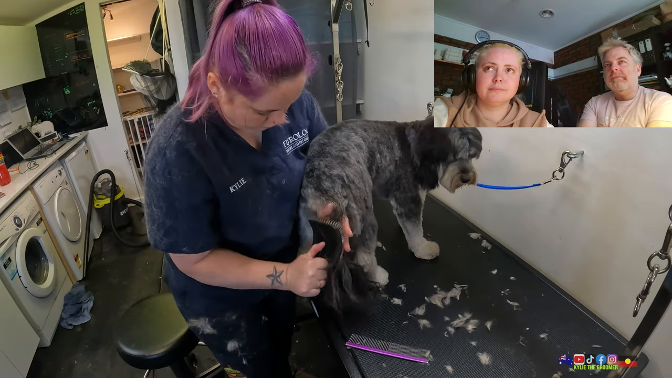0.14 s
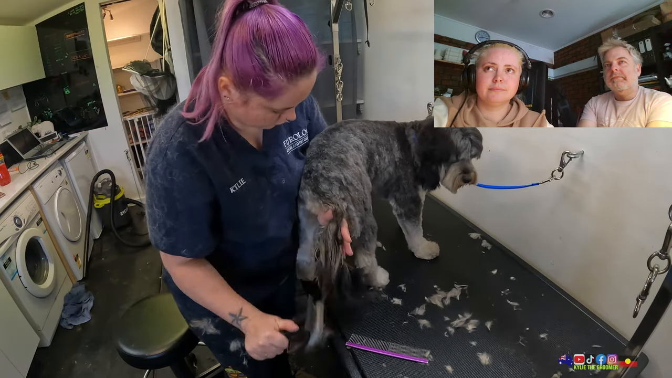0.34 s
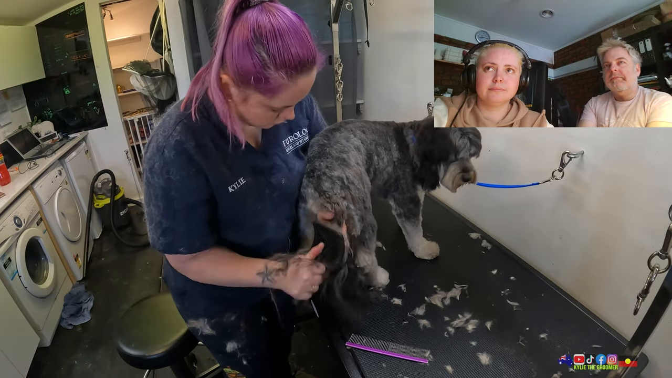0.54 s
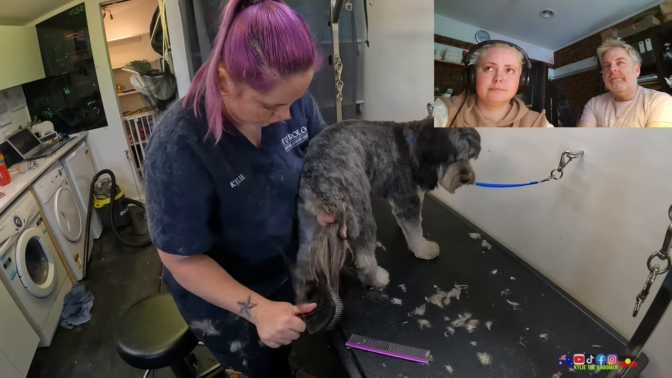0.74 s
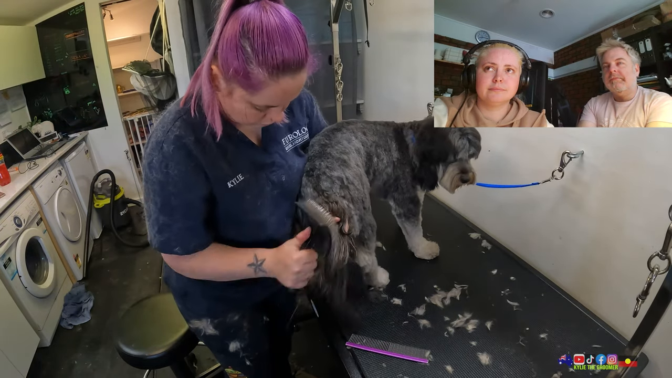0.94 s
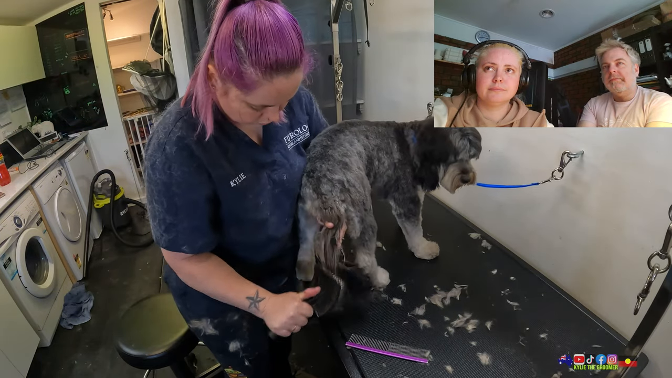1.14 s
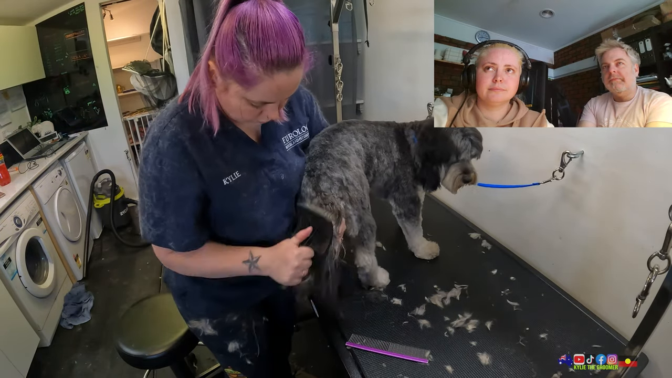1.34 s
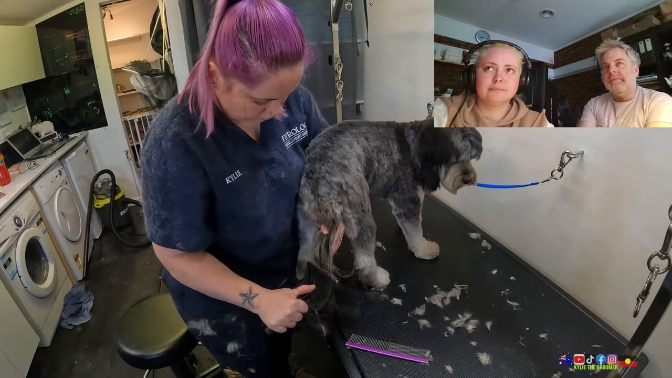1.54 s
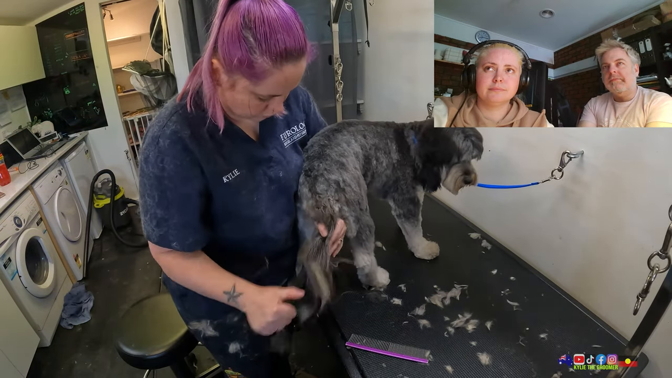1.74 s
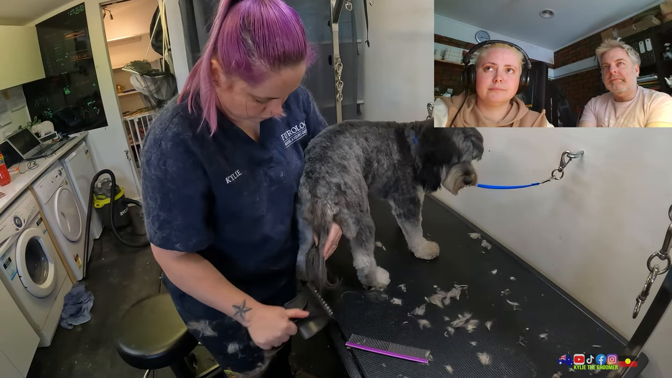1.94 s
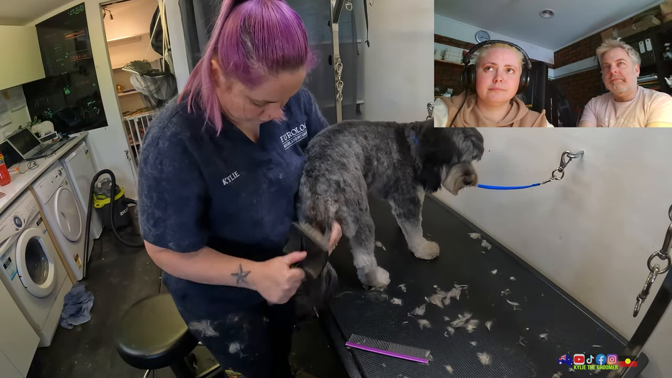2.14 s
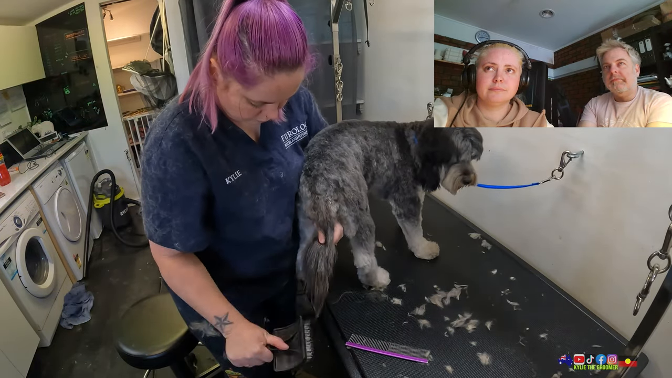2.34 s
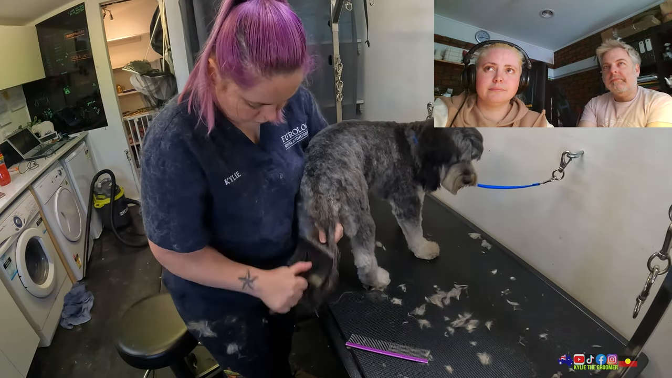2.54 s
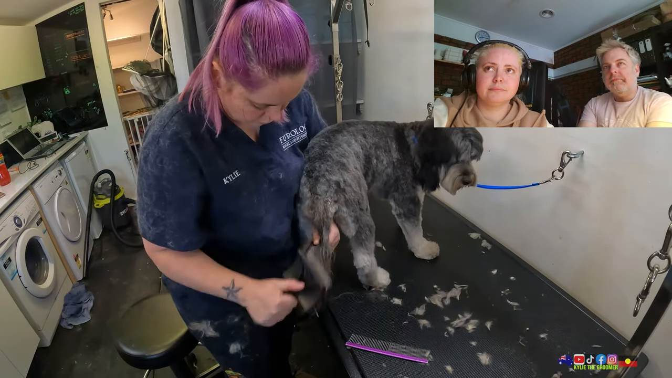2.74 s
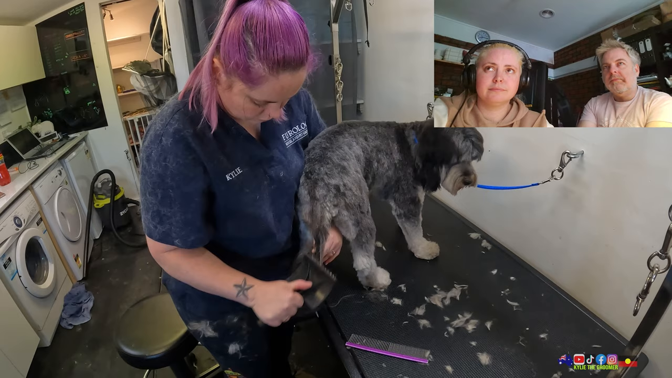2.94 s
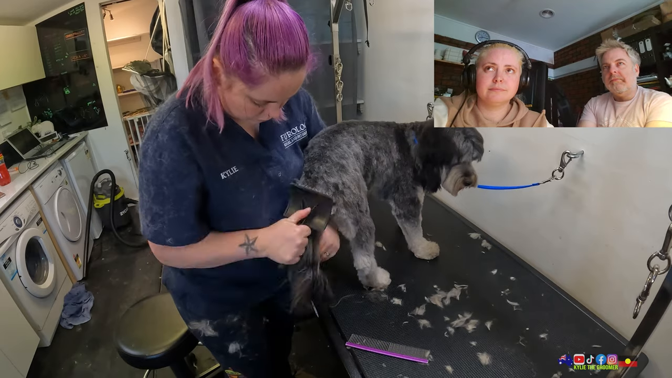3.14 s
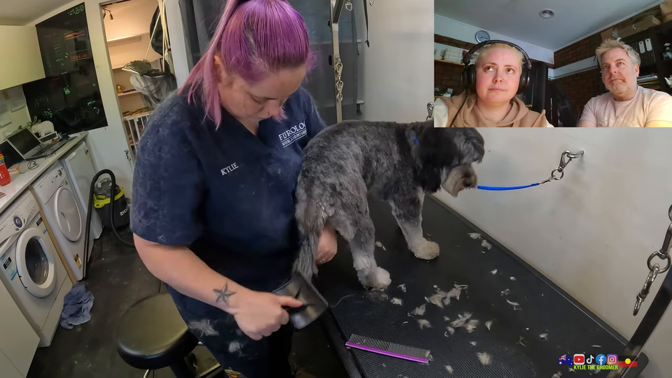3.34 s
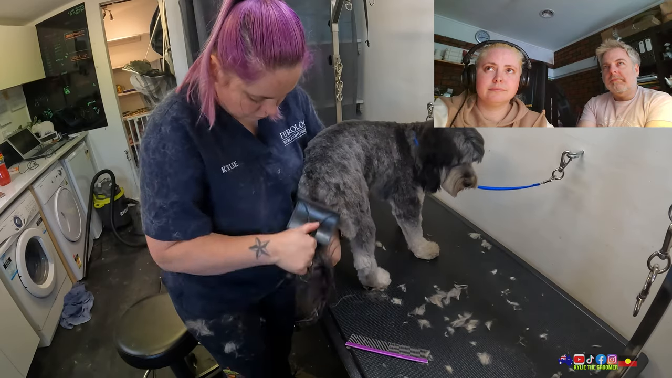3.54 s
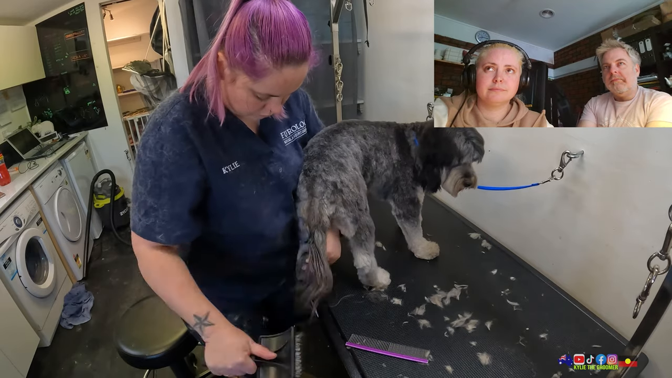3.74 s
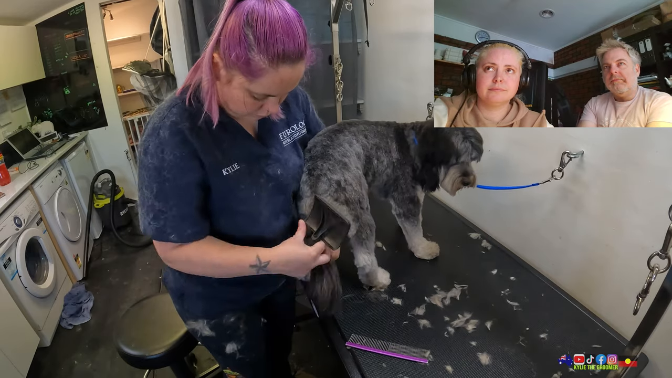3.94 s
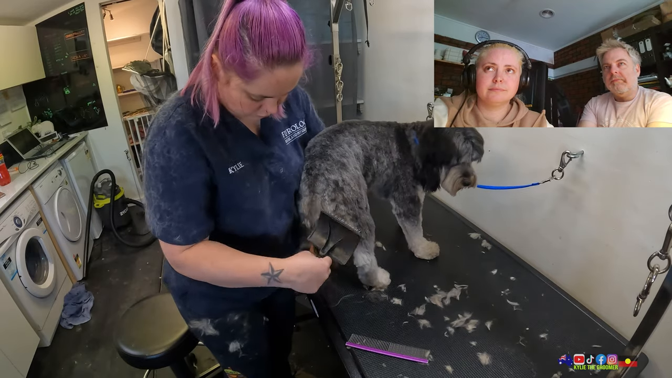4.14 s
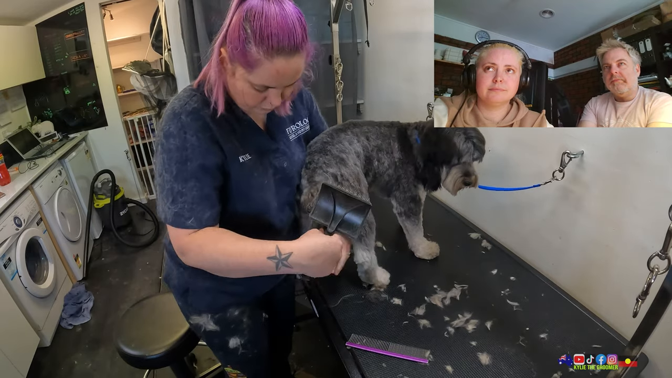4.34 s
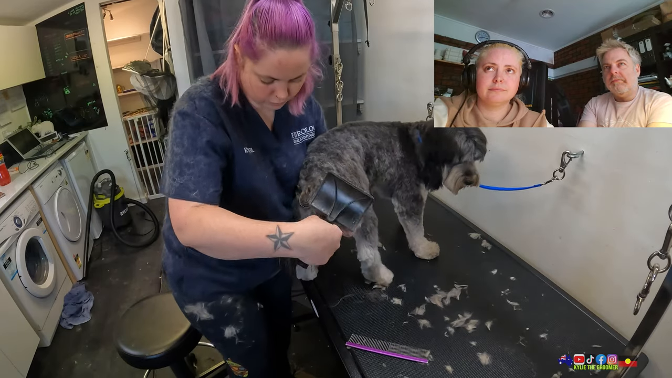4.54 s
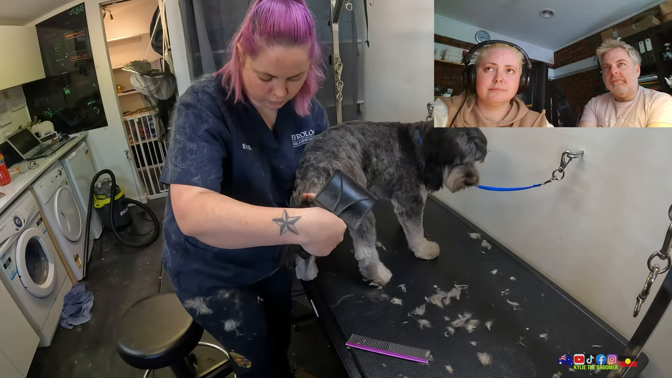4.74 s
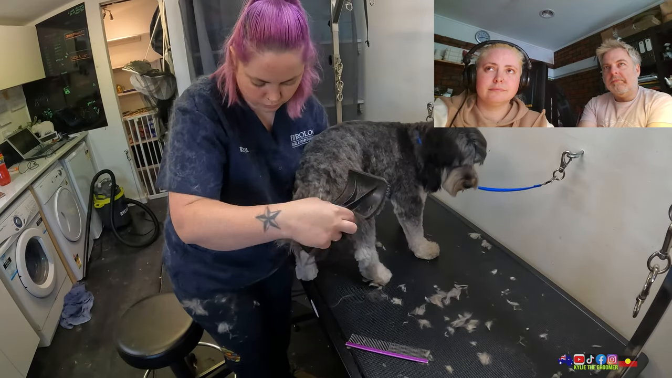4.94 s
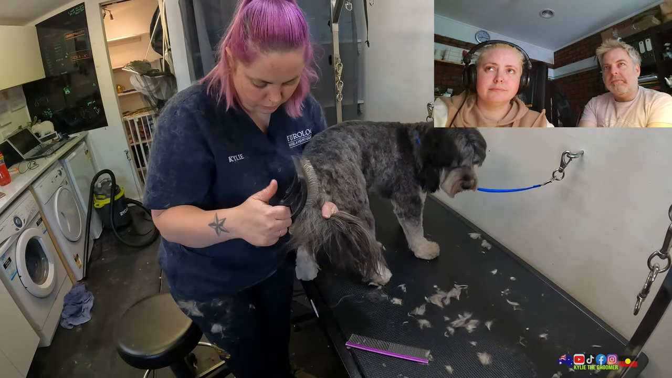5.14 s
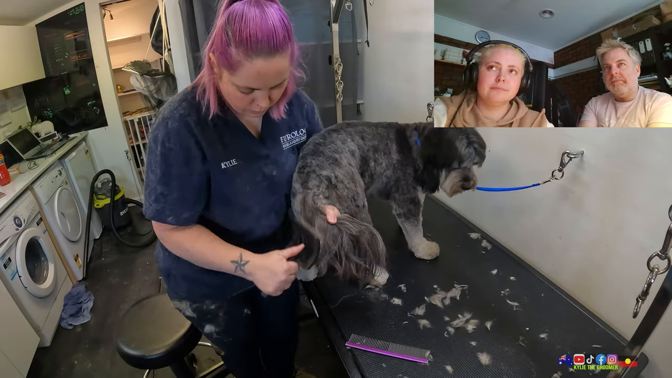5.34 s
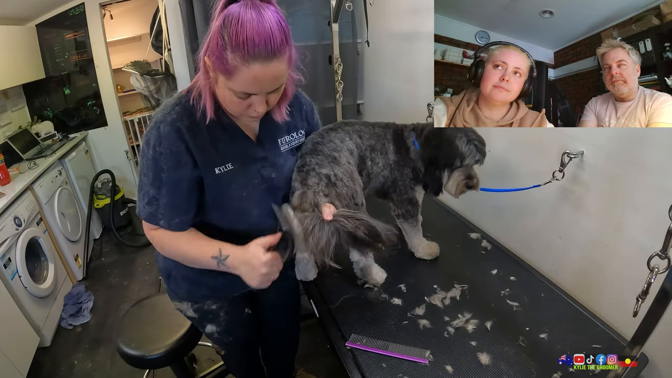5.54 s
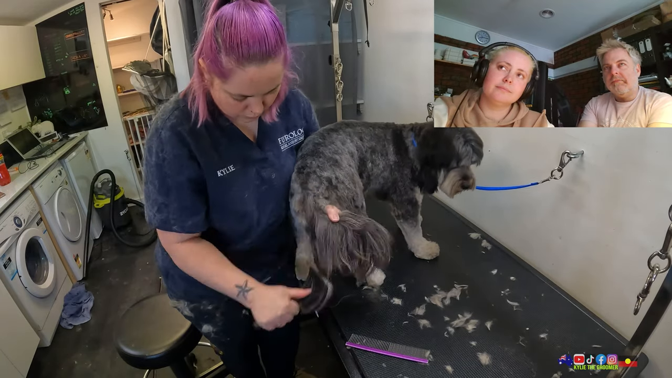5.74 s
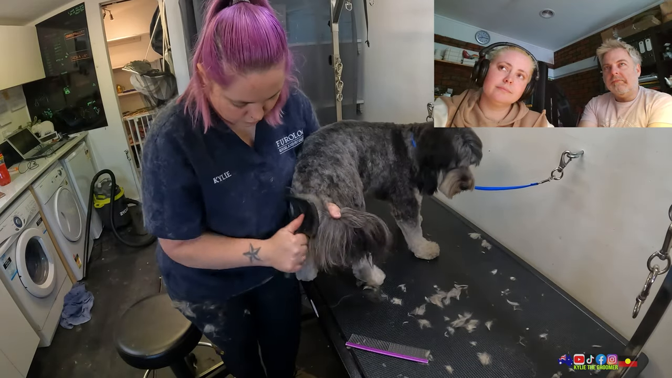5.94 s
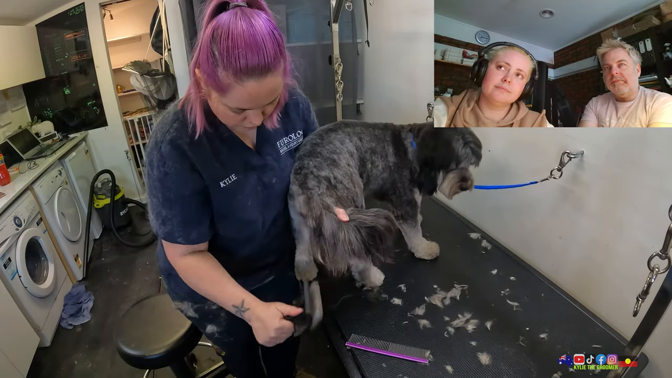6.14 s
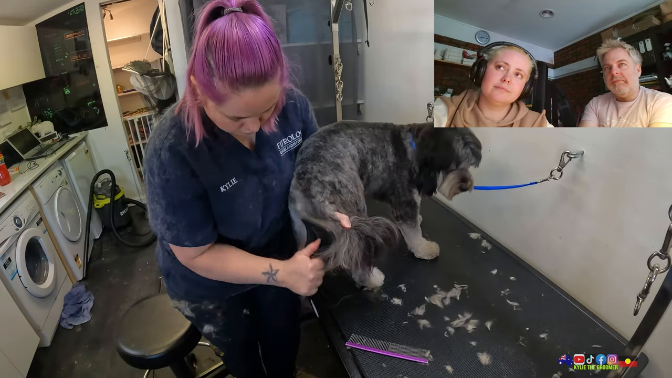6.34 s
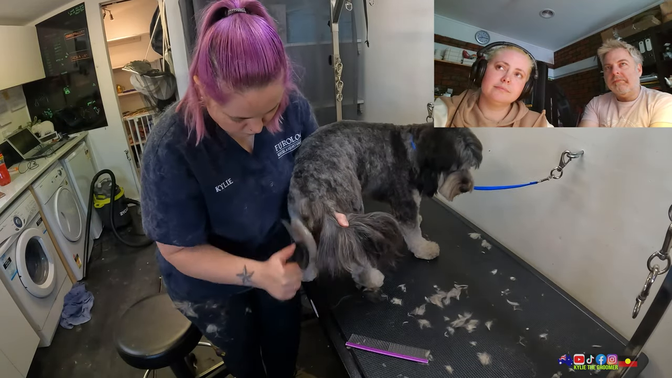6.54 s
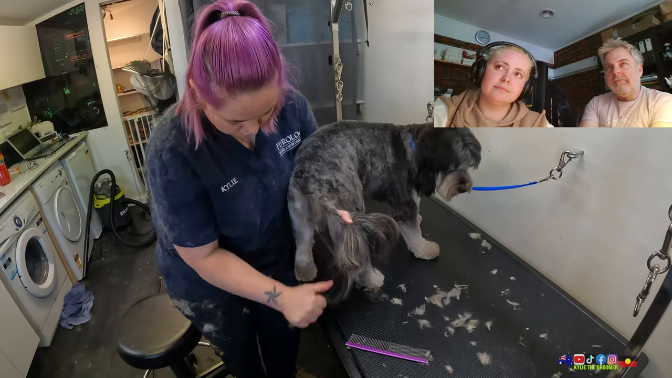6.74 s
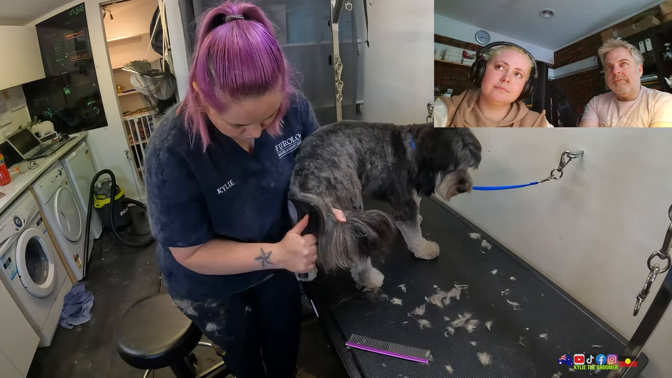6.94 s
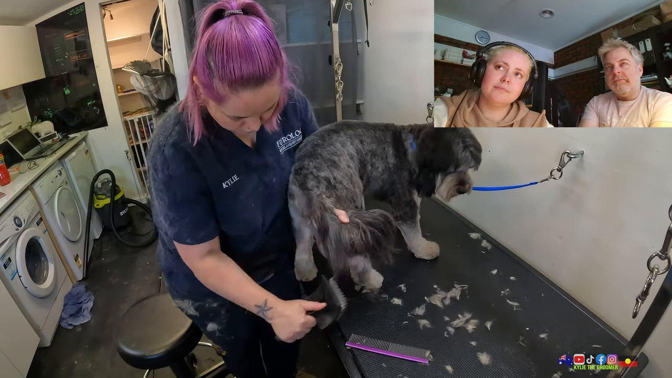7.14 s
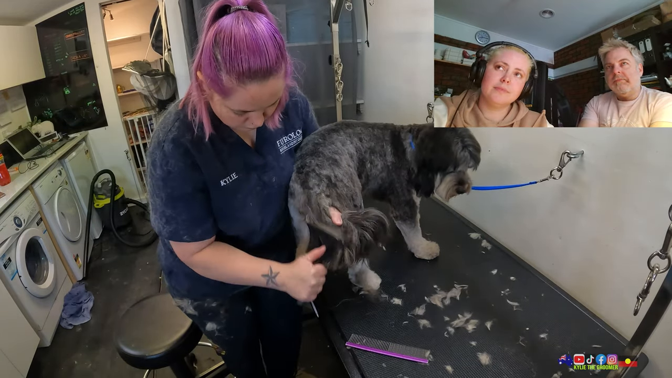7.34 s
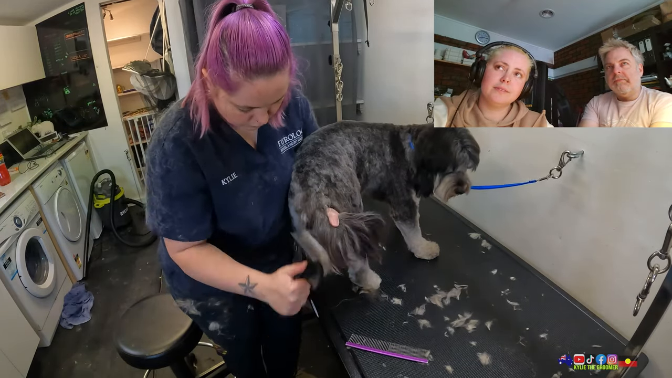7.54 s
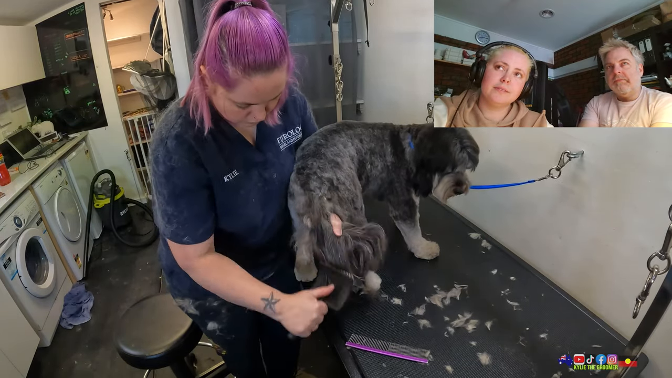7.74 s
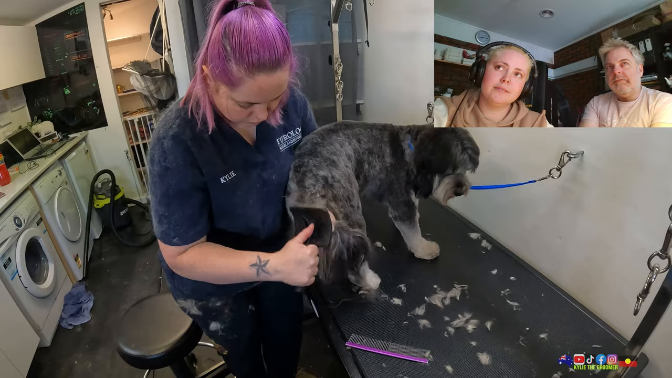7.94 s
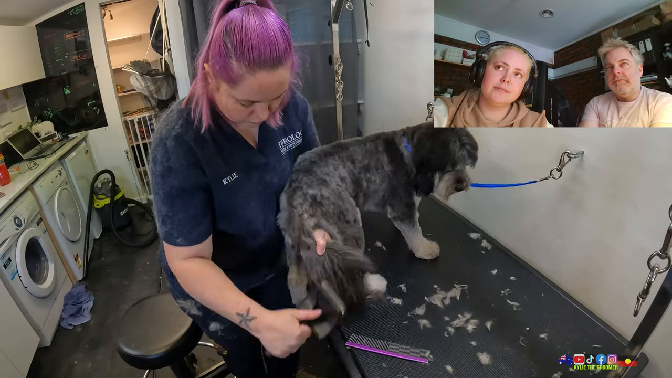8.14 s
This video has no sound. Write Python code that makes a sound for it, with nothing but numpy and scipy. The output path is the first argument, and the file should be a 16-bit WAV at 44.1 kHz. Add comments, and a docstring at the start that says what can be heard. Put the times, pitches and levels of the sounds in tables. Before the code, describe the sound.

A wire slicker brush rakes a dog's matted tail in quick, scratchy strokes, pausing midway for soft handling, over a faint machine drone indoors.

```python
"""A slicker brush is raked through a dog's matted tail in a small, hard-walled grooming room.
Each stroke lands with a tick, bites and drags its wire pins: random plucks excite the modes of the
brush's back, its hollow, pad and pins. Tearing tufts and rubbing hair are short bands of plucks.
Midway the groomer pauses to turn the tail over, with clinks, knocks (filtered noise) and rustles.
A machine drones throughout as narrow-band noise, and two damped low sines bump at the end."""
import sys
import numpy as np
from scipy import signal
from scipy.fft import rfft, irfft, next_fast_len
from scipy.io import wavfile

SR = 44100
rng = np.random.default_rng(int(sys.argv[2]) if len(sys.argv) > 2 else 0)


def put_to_file(sound):
    """Save the sound as 16-bit audio at rate SR, in the file named by the first command-line argument."""
    columns = np.atleast_2d(sound).T  # one column per channel
    safe = np.clip(columns, -1, 1)
    whole_steps = np.round(safe * 32767)
    wavfile.write(sys.argv[1], SR, whole_steps.astype(np.int16))


N = 361619  # length in samples

# Strokes of the brush: landing [t/s], tick [relative level/dB], bite after landing [t/s],
# end of pull after landing [t/s], pull [relative level/dB], tightening from bite to end [level/dB],
# hollow ring [relative level/dB], hollow pitch [f/Hz], scratchiness [relative level/dB]
STROKES = [ (0.158, -23, 0.036, 0.24, -37.5, -5, 2.5, 2015, 2),
           (0.5776, -18.5, 0.045, 0.24, -36, -7.5, 3, 2020, 0.5),
           (1.091, -19, 0.027, 0.15, -35.5, 6, -2, 1970, 2),
           (1.482, -24.5, 0.034, 0.2, -35, -9, -7, 1900, 1),
           (1.919, -36, 0.037, 0.13, -33, -6.5, 0.5, 1930, 3),
           (2.272, -33, 0.031, 0.12, -33.5, -0.5, 2, 1900, 3),
           (2.597, -31, 0.032, 0.074, -32, 11, 1, 1940, 3),
           (2.9432, -26.5, 0.021, 0.11, -35.5, 3, 1, 1820, 2),
           (3.249, -30, 0.031, 0.16, -39.5, 1.5, 7, 1910, 4),
           (3.622, -27.5, 0.015, 0.13, -35.5, 8.5, -3, 1770, 2.5),
           (5.333, -26.5, 0.012, 0.11, -39, 8.5, -4, 2220, -3.5),
           (5.715, -26.5, 0.024, 0.072, -33, -0.5, 2.5, 2120, -1.5),
           (6.040, -25, 0.028, 0.08, -32, 0.5, -0.5, 1980, -2),
           (6.369, -28, 0.029, 0.11, -34.5, 8.5, 1.5, 2000, -2.5),
           (6.713, -31, 0.034, 0.075, -32.5, 9, 6, 1936, 1),
           (7.0354, -26, 0.036, 0.13, -34, 2.5, 1.5, 1990, -2),
           (7.396, -24.5, 0.027, 0.089, -33.5, -0.5, -3, 1960, -1),
           (7.719, -23, 0.03, 0.092, -33, 2.5, -0.5, 1930, -2),
           (8.032, -20, 0.025, 0.11, -32, -1, -2.5, 2030, 1)]
SKIM_DB, BITE_S = -17, 0.019  # level of the skimming pins below their bite; time to dig in
ARCH_DB, RELEASE_DB_PER_S = 2.5, 375  # middle of the pull above its ends; decay as the pins come free


def pull():
    """Friction envelope: the pins skim the coat, bite, pull through in an arch and come free."""
    t, drag = np.arange(SR // 2) / SR, np.zeros(N)
    for landing, _, bite, length, pull_db, tightening_db, *_ in STROKES:
        way = np.interp(t, [bite, length], [-1, 1])  # -1 at the bite, 1 at the end
        level = pull_db + tightening_db * way / 2 - ARCH_DB * way ** 2
        skim = SKIM_DB * np.clip((bite - t) / BITE_S, 0, 1)
        release = RELEASE_DB_PER_S * np.maximum(t - length, 0)
        add(drag, landing, from_db(level + skim - release))
    return drag


# Resonances of the brush's back: [f/Hz], width [f/Hz], [relative level/dB]
BACK = [(722, 33, -0.5), (1046, 40, -3), (1204, 33, 2), (1293, 34, -9.5), (1565, 42, -1.5),
        (1760, 73, -2.5), (2080, 66, -19.5), (2320, 150, 3), (2880, 500, -2.5)]
# Spectrum of the rubber pad: [f/Hz], [relative density level/dB]
PAD = [(150, -24.5), (300, -3.5), (500, -8), (880, -6.5), (1200, 1), (2200, 2.5), (3200, -18.5),
       (6000, -40.5)]
# Spectrum of the wire pins: [f/Hz], [relative density level/dB]
PINS = [(1000, -13.5), (2300, -2), (4200, -2), (5200, 1), (6500, -6), (8200, -9), (9800, -23), (12500, -11),
        (14500, -47), (16000, -66)]
# Spectrum of the pin tips: [f/Hz], [relative density level/dB]
TIPS = [(6000, -26), (10000, -10), (12400, -6), (14000, -8.5), (16000, -64)]
CATCH_HZ = 59  # corner frequency of the catching and slipping
HOLLOW_WIDTH_HZ, HOLLOW_FADE_DB_PER_S = 110, 48


def brushing(back_db, hollow_db, pad_db, pins_db, tips_db, catch_db, flex_db, tangle_db):
    """Stick-slip excitation of coupled parts: plucks ring the back, hollow, pad, pins and tips."""
    t, strokes = np.arange(N) / SR, np.array(STROKES)
    current = np.maximum(np.searchsorted(strokes[:, 0], t) - 1, 0)
    landing, _, bite, *_, ring_db, hollow_hz, scratch_db = strokes[current].T
    drag = pull()
    force = drag * from_db(catch_db * drift(CATCH_HZ))  # the pins catch and slip in the tangles
    slips = plucks(per_s=5000, spread_db=1.5)

    # the load moves across the pad, so the resonances of the back come and go
    back = np.zeros(N)
    for hz, width, db in BACK:
        shifted = np.roll(slips, rng.integers(0, 300))
        back += from_db(db + flex_db * drift(14)) * flexing(shifted, hz, width)
    back = from_db(back_db) * rms_one(back) * force

    # the hollow rings most at the bite, then is damped as hair fills the pins
    hollow_level = hollow_db + ring_db - HOLLOW_FADE_DB_PER_S * np.abs(t - landing - bite)
    hollow = rms_one(flexing(slips, hollow_hz, HOLLOW_WIDTH_HZ)) * from_db(hollow_level) * drag

    pad = colour(plucks(per_s=4000, spread_db=2.0) * force * from_db(pad_db), PAD)
    pins_level = pins_db + scratch_db + tangle_db * drift(20)
    pins = colour(plucks(per_s=5000, spread_db=2.0) * force * from_db(pins_level), PINS)

    # very uneven plucks sound the tips with a very high ping
    tips_level = tips_db + 0.9 * scratch_db + 3 * drift(50)
    tips = colour(plucks(per_s=3500, spread_db=3.6) * drag * from_db(tips_level), TIPS)
    return back + hollow + pad + pins + tips


DETUNE = 0.022  # rms wander of a resonance, as a share of its frequency


def flexing(x, hz, width_hz):
    """Time-varying resonance by heterodyning: its pitch wanders as the pad flexes; gain 1 on top."""
    r = np.exp(-np.pi * width_hz / SR)
    turn = np.exp(2j * np.pi * np.cumsum(hz * (1 + DETUNE * drift(12.0))) / SR)
    baseband = signal.lfilter([1 - r], [1, -r], x / turn + 1e-18)
    return 2 * (turn * baseband).real


# Tufts tearing out of the mats: loudest [t/s], 1/e half length [t/s], [level/dB], pitch [f/Hz]
TEARS = [(.384, 0.0069, -33.5, 1620), (1.593, 0.017, -35.5, 2420), (3.016, 0.019, -33, 3460),
         (3.689, 0.0052, -35, 1990), (3.738, 0.015, -34, 4330), (8.13, 0.026, -31.5, 2340),
         (8.171, 0.013, -35, 2740)]


def tears():
    """Rapid successive release: each tearing tuft is a surge of equal plucks in a broad band."""
    return scrapes(TEARS, width=0.79, per_s=4000, spread_db=0.0)


# Spectrum of ticks and snaps: [f/Hz], [relative density level/dB]
TICK = [(200, -8), (800, 9.5), (1800, 15), (4000, 10), (6000, 13), (9500, 1.5), (13000, 6), (16000, -25)]


def landings(landing_db, patter_db):
    """Impact excitation: the bed of pins lands with a crack and a short, softer patter."""
    track = np.zeros(N)
    for s, db, *_ in STROKES:
        impact = burst(0.0017) + from_db(patter_db) * burst(0.033)
        add(track, s, from_db(db + landing_db) * impact)
    return colour(track, TICK)


# Pins snapping free of the biggest knots: [t/s], [relative level/dB]
SNAGS = [(0.377, -30), (3.071, -31), (3.322, -23), (3.398, -23)]


def snags(snag_db):
    """Sudden release of tension: a very short noise burst for each snapping knot."""
    track = np.zeros(N)
    for s, db in SNAGS:
        add(track, s, from_db(db + snag_db) * burst(0.0075))
    return colour(track, TICK)


# Bent pins springing back: [t/s], [relative level/dB]
PINGS = [(5.344, -45), (5.431, -39.5), (7.468, -35)]


def pings():
    """Elastic recoil: bent pins spring back with a decaying, very high noise band."""
    track = np.zeros(N)
    for s, db in PINGS:
        add(track, s, from_db(db) * burst(0.021))
    return colour(track, TIPS)


SQUEAK_S, SQUEAK_SWELL_S, SQUEAK_FADE_S = 1.342, 0.008, 0.06  # loudest time; time constants
SQUEAK_HZ, SQUEAK_BEND_HZ_PER_S2 = 3230, 22000
SQUEAK_DB, SQUEAK_FLUTTER_DB = -60.5, 4


def squeak():
    """Frequency modulation: a faint, fluttering sine starts level and bends upward as it fades."""
    since = np.clip(np.arange(N) / SR - SQUEAK_S, 0, 0.15)
    pitch = SQUEAK_HZ + SQUEAK_BEND_HZ_PER_S2 * since ** 2
    level = from_db(SQUEAK_DB + SQUEAK_FLUTTER_DB * drift(60))
    tone = np.sin(2 * np.pi * np.cumsum(pitch) / SR)
    return level * swell(SQUEAK_S, SQUEAK_SWELL_S, SQUEAK_FADE_S) * tone


# Light metallic clinks between strokes: [t/s], [relative level/dB]
CLINKS = [(1.394, -46), (1.7716, -39.5), (2.8602, -42), (5.636, -37), (5.8797, -39.5), (6.004, -49)]
# Resonances of the clinking metal: [f/Hz], width [f/Hz], [relative level/dB]
METAL = [(1630, 440, -4.5), (2140, 61, -4), (2680, 220, -9.5), (3970, 520, -15.5), (5620, 290, -11),
         (11330, 47, -17)]


def clinks(clink_db):
    """Modal excitation: decaying noise jingles a parallel bank of metal resonances."""
    jingle = np.zeros(N)
    for s, db in CLINKS:
        add(jingle, s, from_db(db + clink_db) * burst(0.12))
    return sum(from_db(db) * resonate(jingle, hz, width) for hz, width, db in METAL)


# The brush shifting in the hand: [t/s], [relative level/dB], pitch [f/Hz]
KNOCKS = [(3.8684, -45.5, 4670), (4.153, -47, 1820), (4.192, -49, 1790), (4.536, -39, 2520),
          (4.8175, -44, 1440), (4.925, -46.5, 2630), (5.03, -48.5, 3360), (5.551, -50, 3480)]


def knocks(knock_db, crack_db):
    """Heavily damped impact: a band of noise for the body and a wider, shorter one for the crack."""
    track = np.zeros(N)
    for s, db, hz in KNOCKS:
        body = resonate_twice(burst(0.056), hz, 0.5 * hz)
        crack = from_db(crack_db) * resonate_twice(burst(0.0056), hz, 2 * hz)
        add(track, s, from_db(db + knock_db) * (body + crack))
    return track


# Palm and hair rubbing on the brush: loudest [t/s], 1/e half length [t/s], [level/dB], pitch [f/Hz]
RUBS = [(4.555, 0.042, -53.5, 1940), (5.012, 0.015, -61, 4500), (5.065, 0.061, -55.5, 560)]


def rubs():
    """Dry friction: sparse, uneven plucks surge in a band around each rub's pitch."""
    return scrapes(RUBS, width=0.68, per_s=780, spread_db=4.5)


# Hair sliding through the hand, and first the tail of an earlier stroke dying away: loudest [t/s], [relative
# level/dB], # swell time constant [t/s], fade time constant [t/s]
RUSTLES = [(.005, -51.5, .02, 0.026), (3.96, -53, 0.015, 0.034), (4.059, -49, 0.011, 0.0059),
           (4.35, -69, 0.51, .6), (4.55, -55.5, 0.032, 0.081), (5.03, -56, 0.018, 0.055),
           (5.31, -50.5, 0.11, 0.16), (6.33, -70, 0.084, 0.17), (7.35, -66.5, 0.083, 0.058)]
# Spectrum of sliding hair: [f/Hz], [relative density level/dB]
HAIR = [(400, -73), (1100, 0), (3000, -7), (5700, -10), (10000, -24.5), (13500, -25), (16000, -56)]


def rustles(hair_db):
    """Granular friction: dense plucks of hair swell and fade exponentially."""
    slide = sum(from_db(db + hair_db) * swell(s, rise, fall) for s, db, rise, fall in RUSTLES)
    return slide * colour(plucks(per_s=8000, spread_db=3.0), HAIR)


# Phase lag of the left microphone in direct sound: [f/Hz], [phase/rad]
PORT_PHASE = [(200, .05), (700, 0.2), (2800, 0.76), (13000, 0.63)]
# Left minus right: [f/Hz], [level difference/dB]
LEAN = [(200, -0.5), (1000, 1.2), (4500, 0.5), (8000, 1), (12500, 4.5)]


def room(x, direct_db, wet_db, count=6):
    """Convolution reverberation: sound near the brush feeds a changing mix of room responses."""
    size = next_fast_len(N + SR // 2, real=True)
    hz = np.fft.rfftfreq(size, 1 / SR)
    # the brush travels, so it excites changing sets of reflections
    places = np.array([drift(22) for _ in range(count)])
    places /= np.linalg.norm(places, axis=0)
    wet = 0
    for share in places:
        tails = two_ports(room_tail(build_s=0.00015), room_tail(build_s=0.00017))
        wet = wet + rfft(x * share, size) * rfft(tails, size)
    # the left microphone is later and brighter
    lag = at_hz(PORT_PHASE, hz) * np.array([[1], [0]])
    direct = rfft(x, size) * np.exp(-1j * lag)
    lean = from_db(at_hz(LEAN, hz) * np.array([[0.5], [-0.5]]))
    return irfft((from_db(direct_db) * direct + from_db(wet_db) * wet) * lean, size)[:, :N]


# Reverberation of the room: [f/Hz], decay by 60 dB [t/s]
ROOM_T60 = [(200, 0.29), (4000, 0.26), (13000, 0.17)]


def room_tail(build_s, size=10):
    """Diffuse exponential decay: reflections build up at once and die sooner in the treble; energy 1."""
    t = np.arange(SR // 2) / SR
    white, hz = rfft(rng.standard_normal(len(t))), np.fft.rfftfreq(len(t), 1 / SR)
    tail = np.zeros(len(t))
    centres = np.geomspace(200, 14000, size)
    for centre, share in zip(centres, np.eye(size)):
        band = irfft(white * at_hz(np.c_[centres, share], hz), len(t))
        tail += band * fade(at_hz(ROOM_T60, centre))
    tail = tail * np.clip(t / build_s - 1, 0, 1)  # silent until build_s, full at twice that
    return tail / np.linalg.norm(tail)


# Dull bumps: [t/s], [level/dB], pitch [f/Hz], decay by 60 dB [t/s]
BUMPS = [(8.108, -26, 104, 0.17), (8.154, -25, 79, 0.42)]


def bumps():
    """Damped free vibration: soft, heavy contacts boom briefly as low decaying sines."""
    track = np.zeros(N)
    for s, db, hz, t60 in BUMPS:
        add(track, s, from_db(db) * resonate(ring(hz, t60), hz, hz))
    return track


# Spectrum of the room's rumble and hiss: [f/Hz], [relative density level/dB]
ROOM_NOISE = [(18, 4.5), (32, 11.5), (53, -2.5), (140, -12), (226, 0), (330, -10.5), (450, -10),
              (800, -18.5), (2100, -20.5), (3800, -36), (5800, -30.5), (8200, -34), (9300, -42.5),
              (13500, -42.5), (16000, -100)]
# Drone of the machine: [f/Hz], width [f/Hz], [level/dB]
DRONE = [(61.2, 6.5, -61.5), (118.2, 3.6, -66.5), (170.8, 5.8, -67), (215.4, 3.6, -63),
         (324.3, 29.6, -59.5)]


def background(noise_db):
    """Stationary noise: rumble and hiss of the room, with narrow bands as a machine's wavering drone."""
    track = from_db(noise_db) * colour(rng.standard_normal(N), ROOM_NOISE)
    for hz, width, db in DRONE:
        track += from_db(db) * rms_one(resonate(rng.standard_normal(N), hz, width))
    return track


# Difference between two microphones in diffuse sound: [f/Hz], side minus mid [level/dB]
WIDTH = [(30, -15), (70, -17), (130, -8.5), (350, -10.5), (700, -4), (5000, -4.5), (13000, -3)]


def two_ports(mid, side):
    """Diffuse-field coherence: two close microphones hear alike in the bass, less so higher up."""
    side = colour(side, WIDTH, keep_power=False)
    return np.array([mid + side, mid - side])


def scrapes(rows, width, per_s, spread_db):
    """Band-limited friction: Gaussian surges of plucks, width being a share of each pitch."""
    grains, track = plucks(per_s, spread_db), np.zeros(N)
    for s, half, db, hz in rows:
        band = rms_one(resonate_twice(grains, hz, width * hz))
        surge = np.exp(-np.minimum(((np.arange(N) / SR - s) / half) ** 2, 20))
        track += from_db(db) * surge * band
    return track


def plucks(per_s, spread_db):
    """Poisson impulses: hairs slip off pins as random clicks of uneven size; rms 1."""
    at = np.flatnonzero(rng.random(N) < per_s / SR)
    clicks = np.zeros(N)
    clicks[at] = from_db(spread_db * np.minimum(rng.exponential(1, N)[at], 5))
    return rms_one(clicks * rng.choice([-1, 1], N))


def drift(rate_hz):
    """Low-pass random process: slow chance with spread 1, computed at every 40th sample."""
    r = np.exp(-2 * np.pi * rate_hz * 40 / SR)
    white = rng.standard_normal(N // 40 + 2002)
    slow = signal.lfilter([1], [1, -2 * r, r * r], white)[2000:]  # drop the filter's start
    return np.interp(np.arange(N) / 40, np.arange(len(slow)), rms_one(slow))


def swell(s, rise_s, fall_s):
    """Exponential growth to 1 at time s, then decay, each with its own time constant."""
    t = np.arange(N) / SR - s
    return np.exp(-np.maximum(-t / rise_s, t / fall_s))


def fade(t60):
    """Exponential damping over half a second, by 60 dB in t60 seconds."""
    return np.exp(-np.log(1000) * np.arange(SR // 2) / SR / t60)


def burst(t60):
    """Damped white noise."""
    return rng.standard_normal(SR // 2) * fade(t60)


def ring(hz, t60):
    """Damped sine of a struck mode."""
    return np.sin(2 * np.pi * hz * np.arange(SR // 2) / SR) * fade(t60)


def resonate(x, hz, width_hz):
    """Second-order resonance with gain 1 on top."""
    r = np.exp(-np.pi * width_hz / SR)
    poles = [1, -2 * r * np.cos(2 * np.pi * hz / SR), r * r]
    return signal.lfilter(np.array([1, 0, -1]) * (1 - r * r) / 2, poles, x + 1e-18)


def resonate_twice(x, hz, width_hz):
    """Cascade of two equal resonances, for steeper skirts."""
    return resonate(resonate(x, hz, width_hz), hz, width_hz)


def colour(x, spectrum, keep_power=True):
    """Linear filtering by a spectrum; by default white input keeps its power."""
    h = response(spectrum)
    return signal.oaconvolve(x, h / np.linalg.norm(h) if keep_power else h)[:len(x)]


def response(spectrum, size=4096):
    """Minimum-phase principle: the causal impulse response of a spectrum, by its folded cepstrum."""
    cepstrum = irfft(np.log(from_db(at_hz(spectrum, np.fft.rfftfreq(size, 1 / SR)))))
    cepstrum[1:size // 2] *= 2
    cepstrum[size // 2 + 1:] = 0
    return irfft(np.exp(rfft(cepstrum)))


def at_hz(points, hz):
    """Linear interpolation of a table on a log-frequency axis."""
    points = np.array(points)
    return np.interp(np.log(np.maximum(hz, 1)), np.log(points[:, 0]), points[:, 1])


def from_db(db):
    """Decibel law: level to amplitude gain."""
    return np.exp(np.asarray(db) * (np.log(10) / 20))


def rms_one(x):
    """Power normalisation to rms 1."""
    return x / np.sqrt(np.mean(x ** 2) + 1e-20)


def add(track, s, sound):
    """Superposition: mix a sound into a track at time s."""
    start = round(s * SR)
    track[start:start + len(sound)] += sound[:N - start]


def scene():
    """Superposition of brush and hands in the room, dull bumps and the room's drone."""
    near = brushing(back_db=-7.0, hollow_db=-3.0, pad_db=-3.0, pins_db=-6.0, tips_db=-19.5,
                    catch_db=2.0, flex_db=2.0, tangle_db=1.3)
    near = near + tears() + landings(landing_db=-3.0, patter_db=-10.5) + snags(snag_db=-1.0)
    near = near + pings() + squeak()
    near = near + clinks(clink_db=10.5) + knocks(knock_db=10.5, crack_db=-9)
    near = near + rubs() + rustles(hair_db=-0.5)
    floor = two_ports(mid=background(noise_db=-51.5), side=background(noise_db=-52.5))
    return room(near, direct_db=0.0, wet_db=-5.0) + bumps() + floor


def record(dry):
    """Band limitation: an elliptic low-pass cuts steeply above 16 kHz."""
    low_pass = signal.ellip(10, 0.1, 80, 16000, fs=SR, output="sos")
    return signal.sosfilt(low_pass, dry)


dry = scene()
out = record(dry)
put_to_file(out)
```